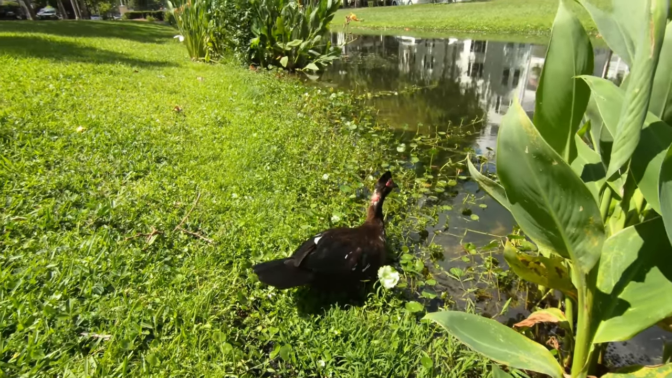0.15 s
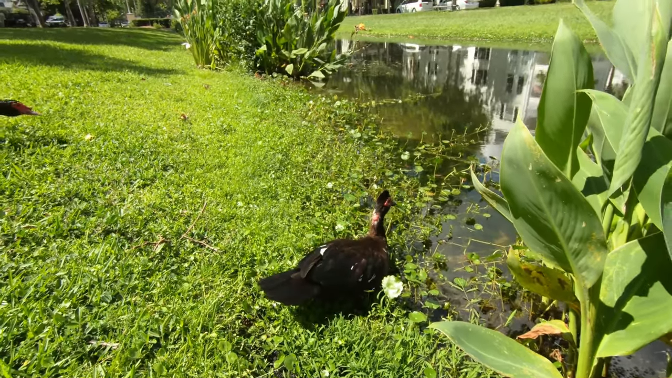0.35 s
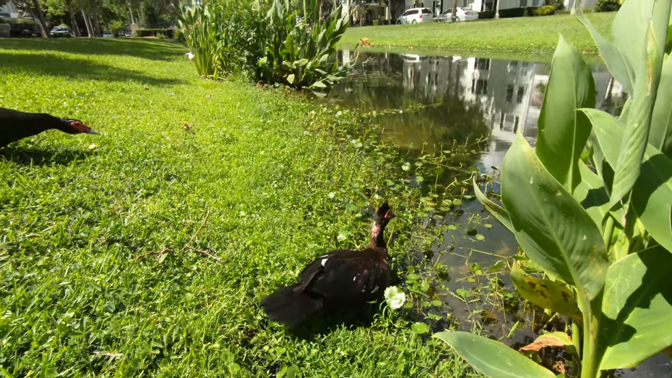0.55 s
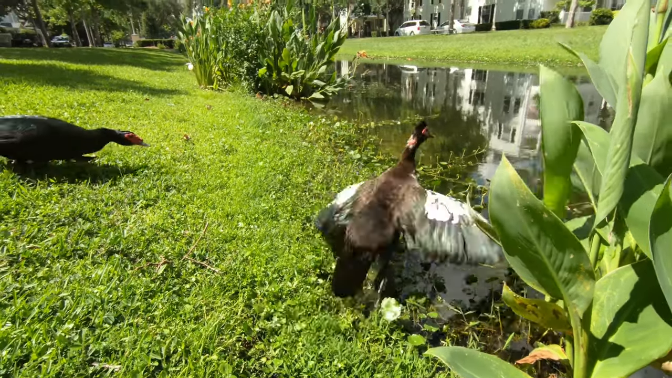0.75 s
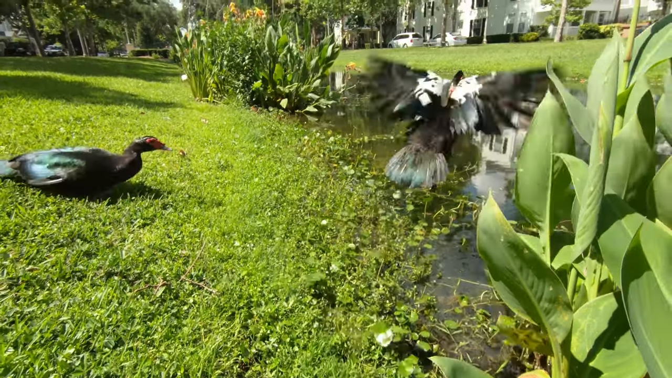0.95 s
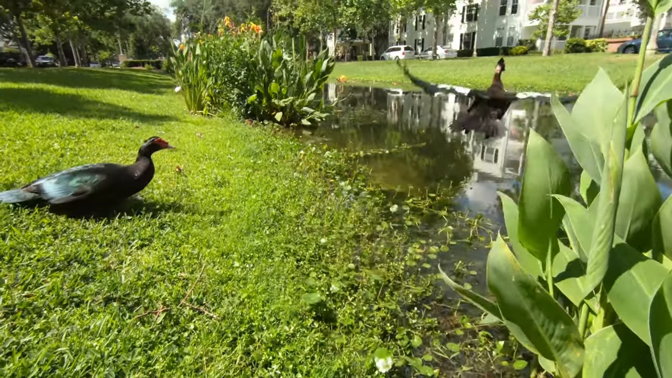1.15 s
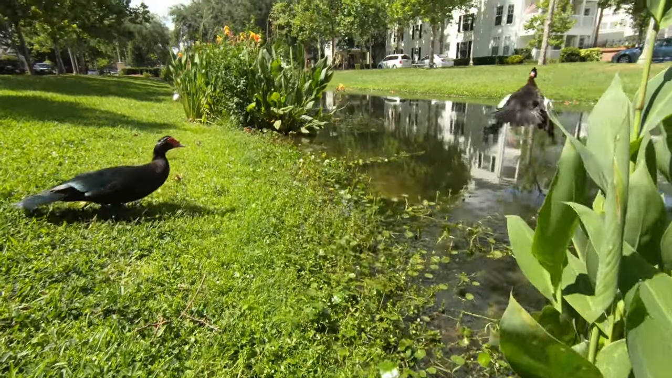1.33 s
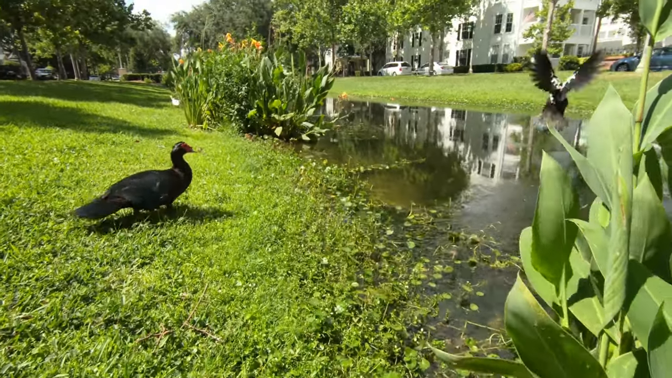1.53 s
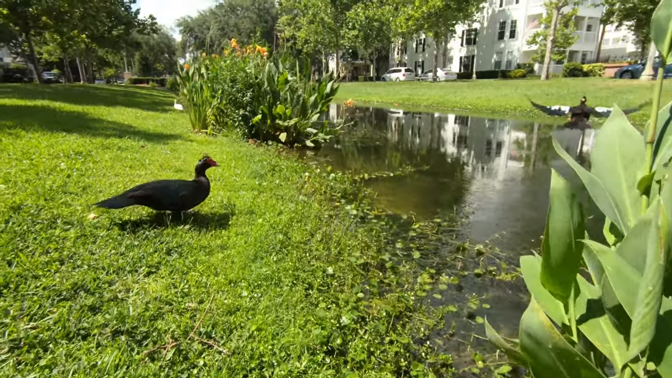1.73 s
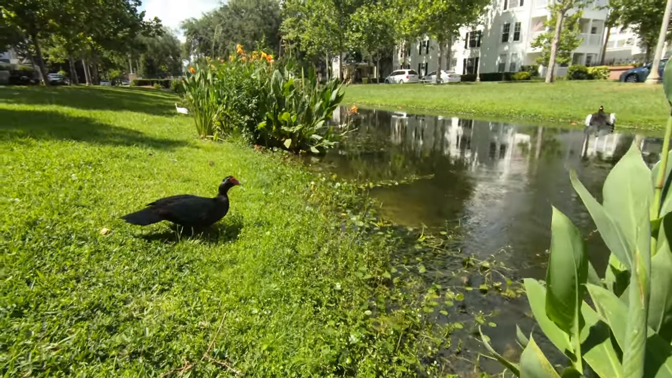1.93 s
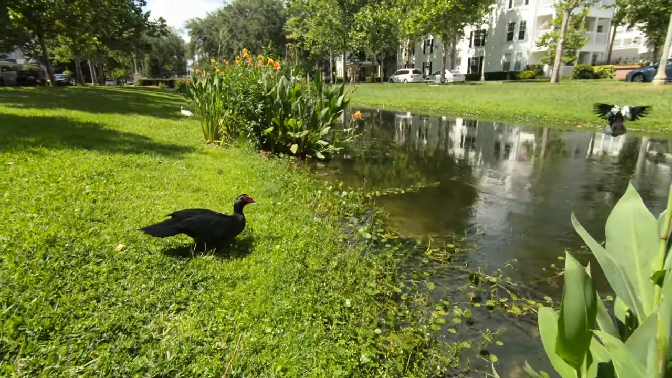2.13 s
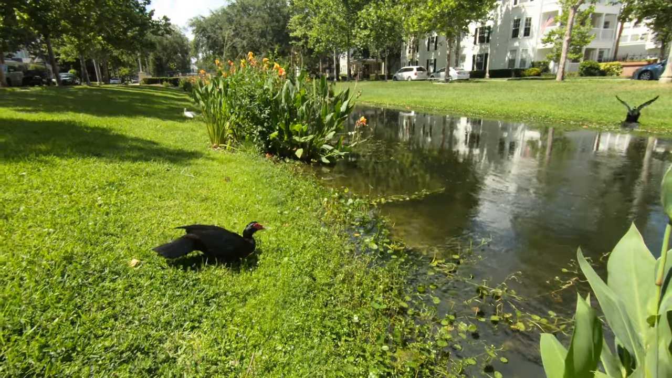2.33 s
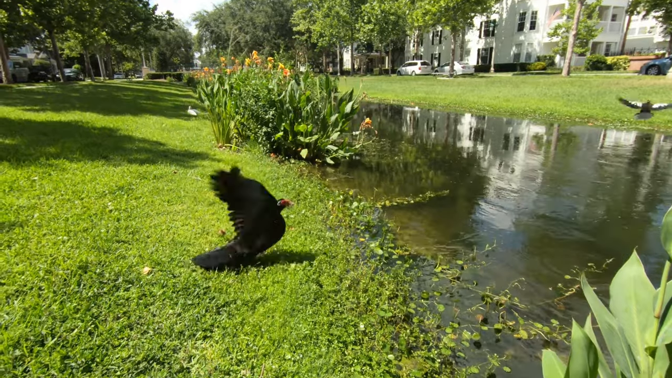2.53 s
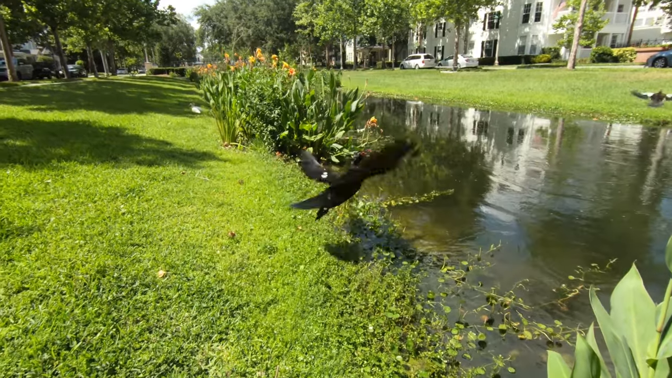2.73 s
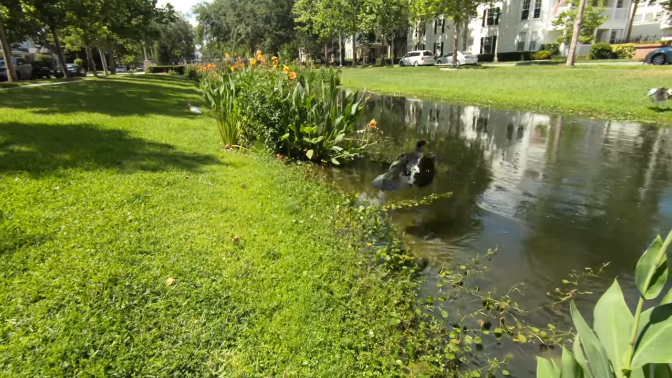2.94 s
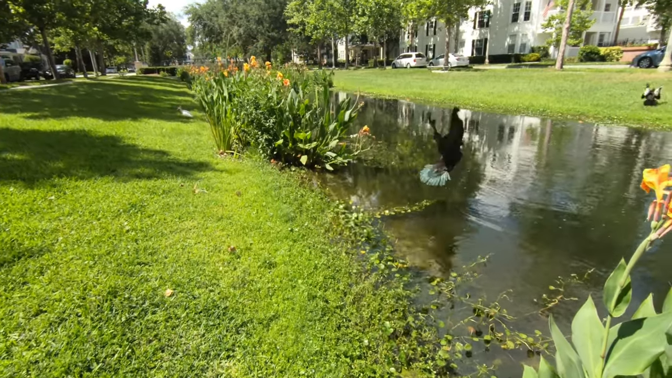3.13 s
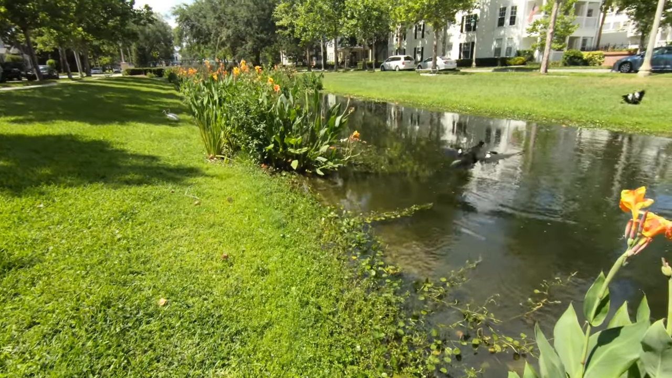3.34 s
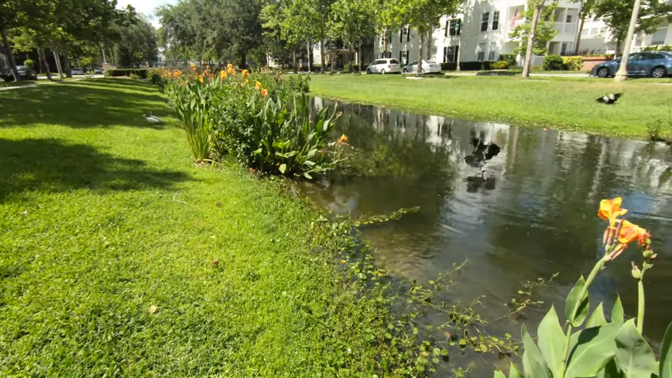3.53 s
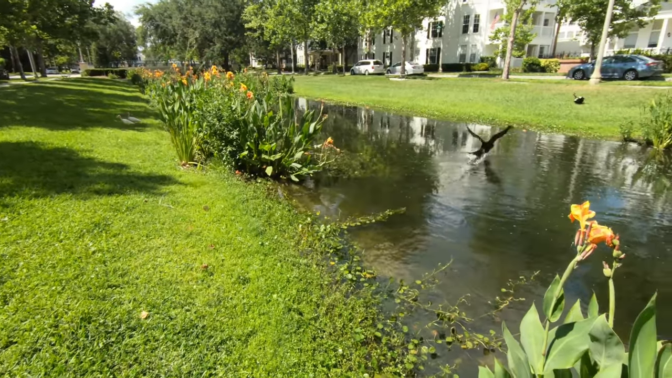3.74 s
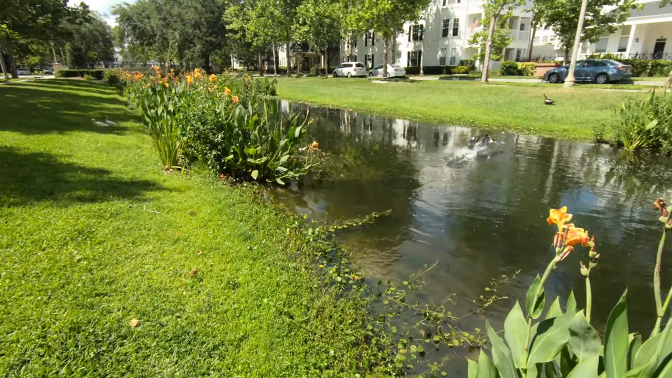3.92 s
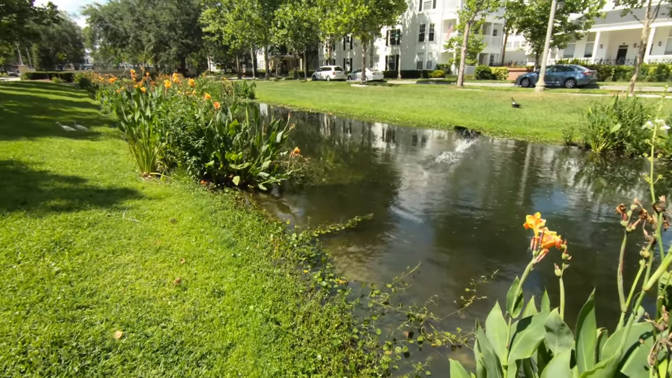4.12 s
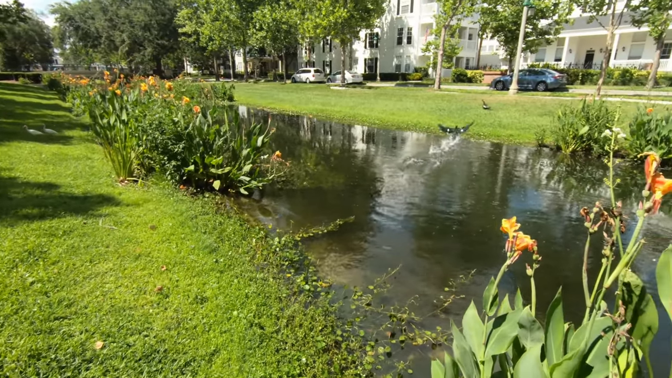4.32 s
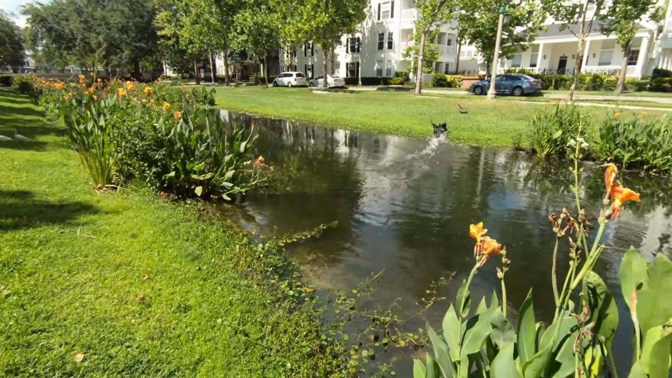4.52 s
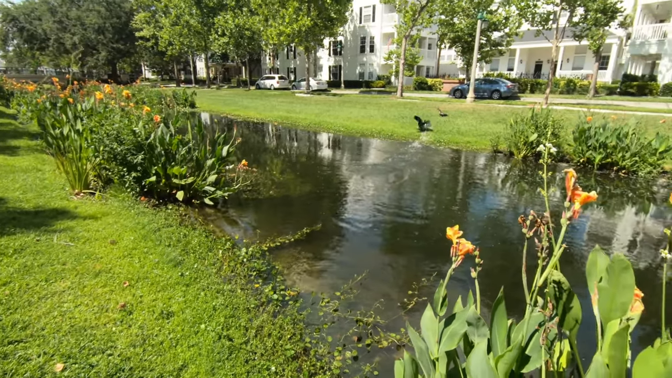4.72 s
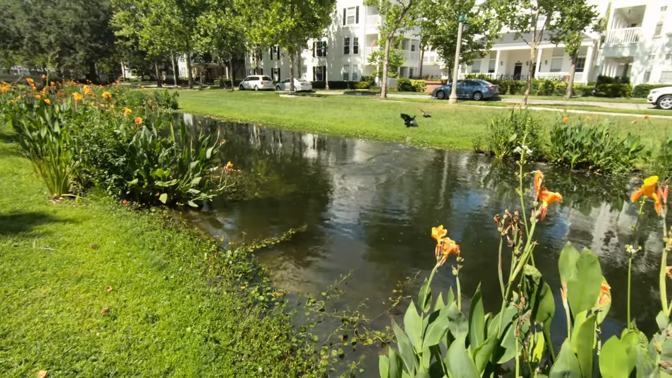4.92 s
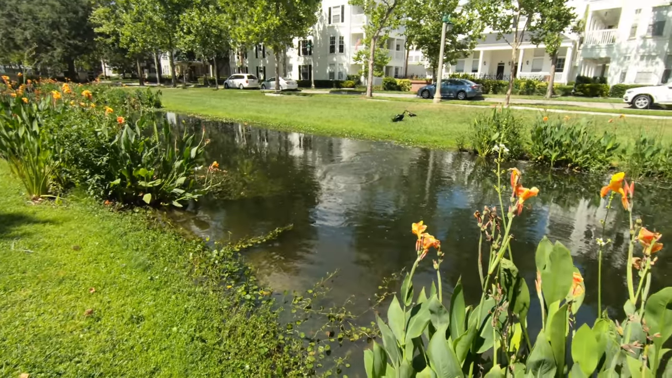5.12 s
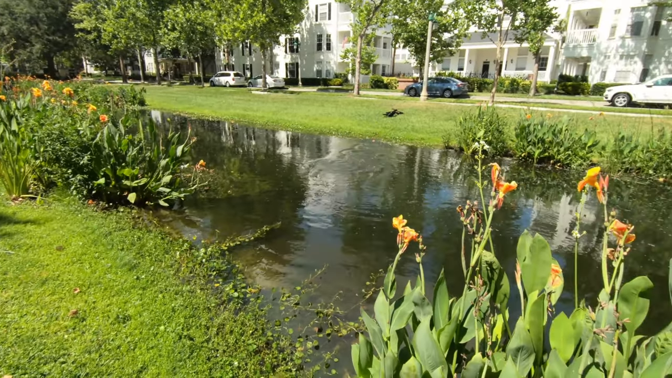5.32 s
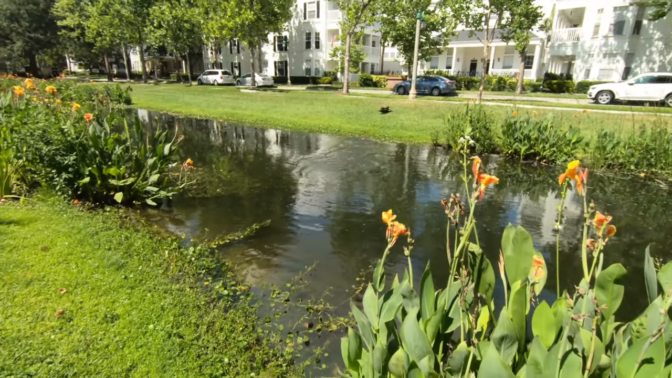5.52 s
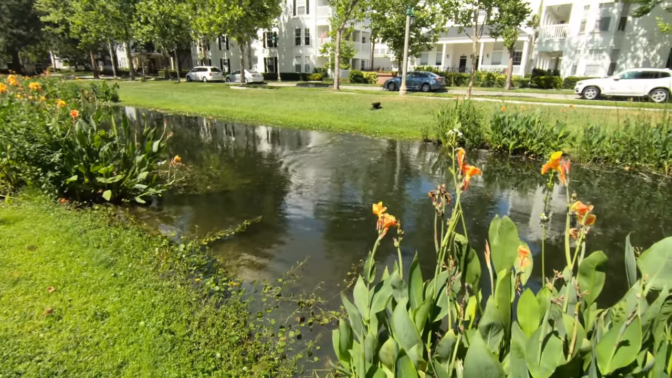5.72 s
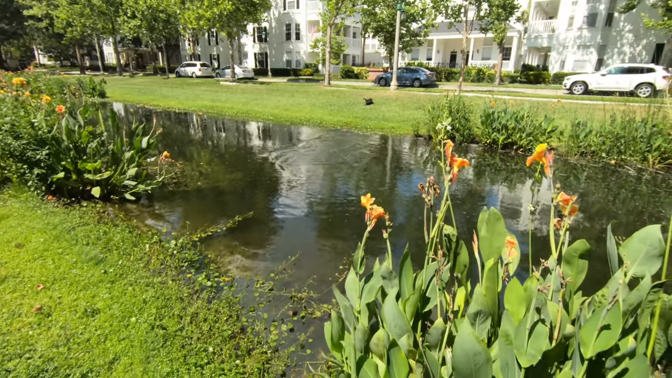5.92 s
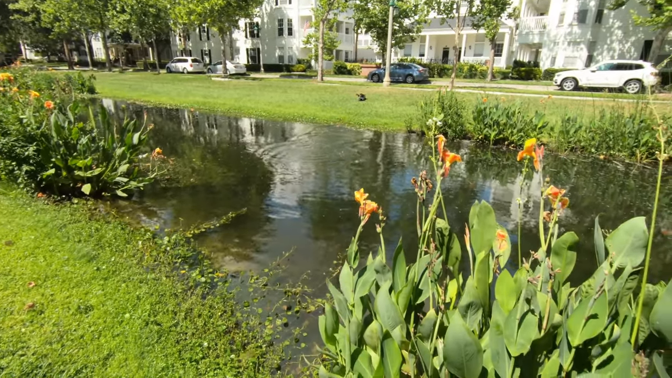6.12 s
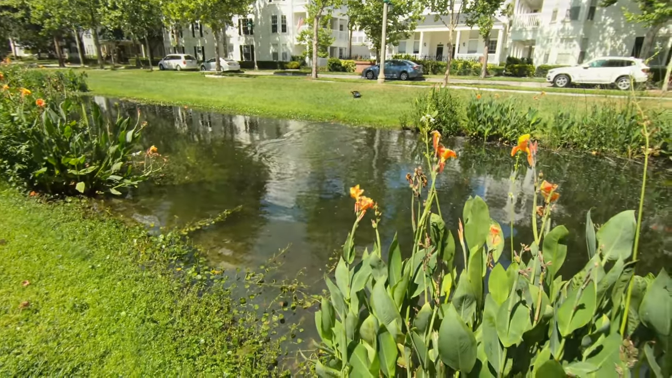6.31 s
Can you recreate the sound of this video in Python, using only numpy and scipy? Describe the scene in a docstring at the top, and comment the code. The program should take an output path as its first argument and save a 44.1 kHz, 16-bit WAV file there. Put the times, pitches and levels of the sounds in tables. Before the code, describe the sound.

Stiff duck wings rustle open and beat away in two fading bursts, then water splashes and drips over soft insect hiss and low wind rumble.

```python
"""Two heavy ducks take off close by, one after the other, from the grassy bank of a canal.
Wings rustle and snap open, then beat away: fluttering tones and pulsed noise make the thrum and rush.
The second duck squelches in mud, then skims the water: noise bursts, grains and ringing bubbles make the spray.
A small bird chirps once (a gliding sine); the near sounds and the chirp return in a faint diffuse echo.
Behind lie shaped noise for town, insects and a car far off, and a breeze rumbling on the microphone."""
import sys
import numpy as np
from scipy import signal
from scipy.fft import rfft, irfft, next_fast_len
from scipy.io import wavfile
from scipy.ndimage import uniform_filter1d, map_coordinates

SR = 44100
rng = np.random.default_rng(int(sys.argv[2]) if len(sys.argv) > 2 else 0)


def int16_out(signal):
    """Quantize to a 16-bit WAV file."""
    q = np.round(np.clip(np.atleast_2d(signal).T, -1, 1) * 32767)
    wavfile.write(sys.argv[1], SR, q.astype(np.int16))


N = 280506

# The two ducks: leap t/s, then dark whoosh, bright swish and feather hiss level/dB relative to a beat's rush,
# and upstroke level/dB relative to the downstroke
DUCKS = [(0.8, 2.8, -0.7, -0.3, -3), (2.63, 4, 1.7, -0.6, -3.5)]
# Wing downstrokes: mid-stroke t/s, air rush reference level/dB, thrum reference level/dB
DOWNSTROKES = [(0.902, -35, -26), (1.045, -37, -36), (1.188, -40, -36.5), (1.333, -43.5, -38.5),
               (1.479, -43.5, -31.5), (1.626, -47.5, -46), (1.773, -47, -42), (1.924, -51, -40),
               (2.772, -33.8, -30), (2.925, -34.5, -25.5), (3.069, -39, -32.5), (3.216, -39.5, -36),
               (3.365, -42, -40), (3.513, -41, -34.5), (3.658, -43.7, -38.5), (3.808, -46, -35.5)]
# Air rushing off the wing, dark part: f/Hz, relative level/dB (per Hz)
WHOOSH_SPECTRUM = [(150, -24.5), (300, -2.5), (460, 0), (650, -6), (830, -6.5), (1050, -11.5), (1500, -24),
                   (2500, -33)]
# Air rushing off the wing, bright part: f/Hz, relative level/dB (per Hz)
SWISH_SPECTRUM = [(500, -17), (850, -4.5), (1100, -2), (1300, -3), (1600, -2), (2100, -13.5), (3000, -22)]
# Feather hiss and crackle: f/Hz, relative level/dB (per Hz)
FEATHER_SPECTRUM = [(1200, -17), (2200, -2), (3400, 0.5), (4600, 2), (5300, -3), (6500, -8.5), (10000, -14),
                    (13000, -18), (16000, -30)]
WHOOSH_DB_PER_DB, FULL_RUSH_DB = 0.15, -39  # strokes harder than this are also darker
LIFT_DELAY_S, LIFT_RISE_S, LIFT_FALL_S = 0.036, 0.016, 0.03  # the wing folds and starts to rise
RETURN_DELAY_S, RETURN_S = 0.085, 0.04  # it spreads again at the top
RETURN_DB, RETURN_FADE_DB_PER_S = -1.5, 14  # loudest in the laboured beats just after the leap
RUSTLE_DB, RUSTLE_DELAY_S, RUSTLE_S = -8.5, 0.065, 0.12  # feathers never quite rest between strokes
DOWNWASH_DB, DOWNWASH_DELAY_S, DOWNWASH_S = -7, 0.03, 0.14  # soft low push of air behind each stroke

# Wings opening over plumage, grass and leaves: middle t/s, length/s, body level/dB, hiss reference level/dB
BRUSHES = [(0.742, 0.082, -48, -41.5), (0.782, 0.024, -42, -36), (0.835, 0.051, -24, -23.3),
           (2.577, .04, -51, -42.5), (2.686, 0.08, -39, -42)]
# Body of that brushing: f/Hz, relative level/dB (per Hz)
BRUSH_SPECTRUM = [(60, -16), (130, 3), (350, -3), (750, 0.5), (1100, -2.5), (1600, -4), (2200, -15),
                  (3200, -18)]
# Snaps of feather tips and stems: t/s, reference level/dB, bright edge and knock relative level/dB
SNAPS = [(0.7116, -35, -9, -3), (0.7955, -11.5, -28, -25), (0.8054, -16, -18, -13), (2.556, -40, -9, -4),
         (2.634, -27, -0.5, 0)]
# Ring of a snap: f/Hz, relative level/dB (per Hz)
SNAP_RING_SPECTRUM = [(1500, -23), (2700, -3.5), (3800, -1.5), (4700, 6.5), (6000, -8), (9000, -47)]
# Bright edge of a snap: f/Hz, relative level/dB (per Hz)
SNAP_EDGE_SPECTRUM = [(4000, -34), (6000, 0), (8000, 1), (12000, -5), (16000, -16)]
# Knock of a snap: f/Hz, relative level/dB (per Hz)
KNOCK_SPECTRUM = [(250, -14), (600, -4), (1000, -8.5), (1500, -5.5), (2100, -7), (3200, -12), (4500, -3)]
# The second duck kicks off from the soggy bank: middle t/s, length/s, squelch f/Hz, level/dB
SQUELCHES = [(2.66, .02, 800, -45), (2.702, .035, 750, -38), (2.815, .028, 900, -38),
             (2.853, .026, 750, -42.5), (2.853, .014, 2700, -41)]

# Feet and wing tips slapping the water: t/s, smack, plop and thrown spray reference level/dB
SLAPS = [(3.251, -33, -31, -54), (3.6862, -31, -43, -40.5), (3.7446, -31, -38, -41.5),
         (3.8902, -26.5, -39, -58), (3.994, -25.5, -39, -43.5), (4.238, -35, -36, -46),
         (4.3582, -31, -29.5, -53), (4.3702, -33, -37, -55), (4.4916, -33, -45, -48),
         (4.5327, -28.5, -45, -52.5)]
# Last single drops: t/s, reference level/dB
DRIPS = [(4.7817, -37.5), (4.8948, -36), (5.1284, -37)]
# Churned water: f/Hz, relative level/dB (per Hz)
CHURN_SPECTRUM = [(180, -40), (300, -6.5), (330, -14), (480, -1), (735, -10.5), (1230, -4.5), (1360, -8.5),
                  (1680, -2), (1880, -13.5), (2400, -14), (3120, -44), (5280, -120)]
# Drops and smacks on the surface: f/Hz, relative level/dB (per Hz)
DROPLET_SPECTRUM = [(1410, -27), (2400, -6), (3310, -2.5), (3600, 2.5), (3830, 1.5), (4730, 2),
                    (6030, -10.5), (6670, -8.5), (8240, -14), (10700, -15), (15500, -28)]
# Low slosh of the wake: f/Hz, relative level/dB (per Hz)
SLOSH_SPECTRUM = [(80, -4), (130, 0), (260, -2), (380, -5), (550, -14)]
# Fine mist over the wake: f/Hz, relative level/dB (per Hz)
MIST_SPECTRUM = [(5000, -12), (7000, 0), (11000, -2.5), (15000, -14)]
SPRAY_RISE_S, SPRAY_FALL_DB_PER_S = 0.025, 31  # drops rain back after each slap
WAKE_S, WAKE_LENGTH_S, WAKE_DB = 4.27, 1.05, -46.3  # churn of the skimming duck: middle, length, level
SLOSH_DB, MIST_DB = -10, -11.5  # relative to the churn

# The small bird's falling chirp: t/s, f/Hz, level/dB
CHIRP = [(4.265, 8380, -58), (4.29, 8400, -41), (4.308, 8360, -43.5), (4.33, 7800, -49.5),
         (4.365, 7300, -50.5), (4.39, 7100, -70)]
# Echo of the far bank: f/Hz, time to fall 60 dB/s
BANK_DECAY = [(200, 0.28), (1500, 0.29), (5000, 0.66), (12000, 0.27)]
# A car rolling on the far side: t/s, level/dB
CAR_LEVEL = [(4.3, -66), (5.0, -54), (5.5, -47.5), (6.36, -48.5)]
# Its low drone: f/Hz, relative level/dB (per Hz)
EXHAUST_SPECTRUM = [(45, -12), (66, 1.5), (78, -5), (94, -4.5), (125, -10.5), (170, -21)]
# The surroundings: t/s, town level/dB, insect level/dB
AIR_LEVELS = [(0, -51, -53.5), (.6, -51.5, -52), (2.2, -50, -52.5), (3.5, -48, -51), (5.2, -50, -54.5),
              (6.36, -50, -55.5)]
# Distant town: f/Hz, relative level/dB (per Hz)
TOWN_SPECTRUM = [(76, -20), (130, -4.5), (194, -2.5), (246, -4.5), (333, -11), (363, -9), (422, -10),
                 (450, -11.5), (663, -9.5), (724, -10), (978, -11.5), (1480, -12.5), (2600, -18.5),
                 (3380, -70), (5720, -120)]
# Insects: f/Hz, relative level/dB (per Hz)
INSECT_SPECTRUM = [(1530, -20.5), (2600, -1.5), (3460, -2.5), (4020, -1), (4500, 0), (5860, -10.5),
                   (10400, -13.5), (11600, -14), (15100, -17.5), (15700, -18)]
# Likeness of the background noise at left and right: f/Hz, correlation (1 = the same)
LEFT_RIGHT_LIKENESS = [(60, 1.0), (180, 1.0), (550, 1.0), (1650, 1.0), (4970, 1), (15000, 0.79)]
# Breeze on the microphone: t/s, level/dB
BREEZE_LEVEL = [(0, -43.5), (.68, -41), (.88, -31), (1.15, -38), (1.8, -33.5), (2.25, -38.5), (2.95, -34.5),
                (3.7, -39.5), (4.6, -43), (5.45, -38.5), (6.36, -45)]
# Breeze rumble: f/Hz, relative level/dB (per Hz)
RUMBLE_SPECTRUM = [(8.8, -28), (15, 1), (29, -3.5), (49, -12.5), (75, -15), (96, -20.5), (130, -23),
                   (170, -47), (290, -120)]
# Gusts that strike the microphone: middle t/s, length/s, mean eddy f/Hz, eddy level/dB, flurry level/dB
GUSTS = [(0.56, .07, 35, -37, -48), (1.475, .095, 27, -23, -35), (1.648, 0.1, 42, -16.5, -28.5),
         (2.005, 0.085, 19, -25.5, -42), (4.91, .12, 22, -33, -52)]
# Low air noise of gusts and downwash: f/Hz, relative level/dB (per Hz)
FLURRY_SPECTRUM = [(30, -2), (60, -2.5), (110, -4), (160, -9), (230, -20), (400, -40)]
BREEZE_SWING_DB, BREEZE_SWINGS_PER_S = 2, 8
TOP_HZ = 15850  # upper band limit of the recorder


def wingbeats(flutter_hz=226, stroke_s=0.015, pulsing=0.39, edge_lead_s=0.0045):
    """On each downstroke the flight feathers flutter and chop the rushing air; they rustle as the wing lifts."""
    t = clock()
    thrum, whoosh, swish, hiss = np.zeros((4, N))
    for s, rush_db, thrum_db in DOWNSTROKES:
        # the duck that leapt last is the one beating
        leap, whoosh_db, swish_db, hiss_db, lift_db = [duck for duck in DUCKS if duck[0] < s][-1]
        pitch, start = rng.normal(1, 0.031), rng.random()
        phase = 2 * np.pi * (flutter_hz * pitch * (t - s) + start)
        flutter = np.sin(phase) + amp(-18) * np.sin(2 * phase)
        thrum += amp(thrum_db + 5.5) * swell(s, stroke_s) * flutter
        puffs = 1 + pulsing * np.sin(phase)  # the air leaves in puffs, one each flutter
        # the leading edge cuts the air first: bright, then dark
        edge = puffs * stroke_shape(s - edge_lead_s, rise=0.02, fall=0.032)
        push = puffs * swell(s - 0.001, 0.025, order=3)
        up = amp(lift_db) * upstroke(s, since_leap=s - leap)
        dark_db = whoosh_db + WHOOSH_DB_PER_DB * (rush_db - FULL_RUSH_DB)
        whoosh += amp(rush_db + dark_db) * (push + amp(-5.5) * up)
        swish += amp(rush_db + swish_db) * (edge + amp(-1.5) * up)
        hiss += amp(rush_db + hiss_db) * (edge + amp(-0.3) * up)
    dark_air = whoosh * patchy(noise(WHOOSH_SPECTRUM), depth_db=3)
    bright_air = swish * patchy(noise(SWISH_SPECTRUM), depth_db=4.5)
    feather_grains = grains(FEATHER_SPECTRUM, rate=1600, spread_db=3.5, share=0.45)
    feathers = hiss * patchy(feather_grains, depth_db=3)
    return thrum + mirrored(dark_air + bright_air, delay=0.00186, strength=0.19) + feathers


def upstroke(s, since_leap):
    """Rustle level after the downstroke at time s: the wing folds, rises and spreads again."""
    lift = stroke_shape(s + LIFT_DELAY_S, LIFT_RISE_S, LIFT_FALL_S)
    spread = amp(RETURN_DB - RETURN_FADE_DB_PER_S * since_leap) * swell(s + RETURN_DELAY_S, RETURN_S)
    rustle = amp(RUSTLE_DB) * swell(s + RUSTLE_DELAY_S, RUSTLE_S)
    return np.sqrt(lift ** 2 + spread ** 2 + rustle ** 2)


def stroke_shape(s, rise, fall):
    """A bump that peaks at time s, with its own widths before and after."""
    return np.where(clock() < s, swell(s, rise), swell(s, fall))


def mirrored(x, delay, strength):
    """The direct sound plus its bounce off the flat water, scaled to keep about the same power."""
    bounce = np.interp(clock() - delay, clock(), x)
    return (x + strength * bounce) / np.hypot(1, strength)


def downwash():
    """Every downstroke shoves a low puff of air along the bank."""
    level = np.zeros(N)
    for s, rush_db, _ in DOWNSTROKES:
        level += amp(rush_db + DOWNWASH_DB) * swell(s + DOWNWASH_DELAY_S, DOWNWASH_S)
    return level * noise(FLURRY_SPECTRUM)


def brushes():
    """Stiff feathers scrape past each other and through the plants on the bank."""
    body = sum(amp(db) * swell(s, length, order=4) for s, length, db, _ in BRUSHES)
    hiss = sum(amp(db) * swell(s, length, order=4) for s, length, _, db in BRUSHES)
    scrape = patchy(noise(BRUSH_SPECTRUM), depth_db=2.0)
    crackle = patchy(grains(FEATHER_SPECTRUM, rate=3600, spread_db=4, share=0.53), depth_db=1.0)
    return body * scrape + amp(-0.5) * hiss * crackle


def snaps():
    """Sharp snaps as the wings are flung open: decaying bursts through ring, edge and knock colours."""
    s, db, edge_db, knock_db = np.transpose(SNAPS)
    ring = cracks(s, db - 2, t60=0.006, tail_db=-11, tail_t60=0.03)
    edge = cracks(s, db + edge_db + 4, t60=0.008, tail_db=-12, tail_t60=0.071)
    knock = cracks(s, db + knock_db + 4, t60=0.02, tail_db=-9, tail_t60=0.073)
    bright = coloured(ring, SNAP_RING_SPECTRUM) + coloured(edge, SNAP_EDGE_SPECTRUM)
    return bright + coloured(knock, KNOCK_SPECTRUM)


def squelches():
    """Pockets of air burst in wet mud under the pushing feet."""
    out = np.zeros(N)
    for s, length, hz, db in SQUELCHES:
        pocket = [(hz * 0.6, -14), (hz, 0), (hz * 1.4, -14)]
        out += amp(db) * swell(s, length, order=3) * grains(pocket, rate=400, spread_db=3, share=0.7)
    return out


def splashes():
    """Slaps on the surface, churned water and a patter of drops behind the skimming duck."""
    churn_level = swell(WAKE_S, WAKE_LENGTH_S) * amp(WAKE_DB + 1.2 * wobble(35))
    spray_power = sum((amp(db) * spray(s)) ** 2 for s, _, _, db in SLAPS)
    drops_level = np.sqrt(spray_power) * amp(0.8 * wobble(35))
    churn = churn_level * patchy(grains(CHURN_SPECTRUM, rate=300, spread_db=1.5, share=0.42), depth_db=2.5)
    drops = drops_level * patchy(grains(DROPLET_SPECTRUM, rate=450, spread_db=3.5, share=0.55), depth_db=3)
    plinks = bubbles(drops_level * amp(-2.5), rate=140, pitch_hz=2900, spread=0.6, cycles=24)
    s, smack_db, plop_db, _ = np.transpose(SLAPS)
    smack = coloured(cracks(s, smack_db - 7.5, t60=0.012, tail_db=-5.5, tail_t60=0.1), DROPLET_SPECTRUM)
    plop = coloured(cracks(s, plop_db - 1.5, t60=0.025, tail_db=-10, tail_t60=0.06), CHURN_SPECTRUM)
    drip_s, drip_db = np.transpose(DRIPS)
    drips = coloured(cracks(drip_s, drip_db - 7, t60=0.012, tail_db=-6, tail_t60=0.08), DROPLET_SPECTRUM)
    slosh = churn_level * amp(SLOSH_DB) * patchy(noise(SLOSH_SPECTRUM), depth_db=2.5)
    mist = churn_level * amp(MIST_DB) * grains(MIST_SPECTRUM, rate=1500, spread_db=3, share=0.4)
    return churn + slosh + mist + drops + plinks + smack + plop + drips


def spray(s):
    """Level of the drops that rain back after a slap at time s."""
    age = np.maximum(clock() - s, 0)
    return (1 - np.exp(-age / SPRAY_RISE_S)) * amp(-SPRAY_FALL_DB_PER_S * age)


def bubbles(level, rate, pitch_hz, spread, cycles):
    """Short rising rings of trapped air, at random times, sized by a level curve."""
    chance = rng.random((int(rate * N / SR), 3))  # one row a bubble: time, pitch, size
    start = (chance[:, :1] * (N - 1)).astype(int)
    hz = pitch_hz * np.exp(spread * (2 * chance[:, 1:2] - 1))
    size = level[start] * amp(-4 * np.log(chance[:, 2:] + 0.03))
    step = np.arange(SR // 50)
    age = hz * step / SR / cycles  # 1 after the given number of cycles at the starting pitch
    envelope = np.exp(-3 * age) * (1 - np.exp(-20 * age))
    ring = size * envelope * np.sin(2 * np.pi * cycles * age * (1 + 0.053 * age))
    return np.bincount((start + step).ravel(), ring.ravel(), N)[:N]


def small_bird():
    """A thin whistle that holds, then falls with a quaver."""
    hz, db = curves(CHIRP)
    fall = hz.max() - hz
    phase = 2 * np.pi * np.cumsum(hz + 0.45 * fall * wobble(400)) / SR
    sounding = (clock() > CHIRP[0][0]) * (clock() < CHIRP[-1][0])
    return amp(db) * np.sin(phase) * sounding


def echo(x):
    """A faint diffuse answer from trees and houses: noise that decays at its own rate in each band."""
    hz, t, z = signal.stft(rng.standard_normal(SR // 2), SR, nperseg=256)
    decay = amp(-60 * t / along(BANK_DECAY, hz)[:, None])
    tail = signal.istft(z * decay, SR, nperseg=256)[1]
    delayed = np.pad(x, (SR // 50, 0))  # 20 ms
    return signal.fftconvolve(delayed, tail / np.linalg.norm(tail))[:N]


def far_car():
    """Only the low drone of a slow car carries across the water."""
    db, = curves(CAR_LEVEL)
    return amp(db) * noise(EXHAUST_SPECTRUM)


def surroundings():
    """Far traffic and insect sizzle, near mono, with some independent left and right hiss in the highest treble."""
    town_db, insects_db = curves(AIR_LEVELS)
    town = amp(town_db + 0.27 * wobble(5.13))
    insects = amp(insects_db + 0.6 * wobble(8))
    pair = np.array([town * noise(TOWN_SPECTRUM) + insects * noise(INSECT_SPECTRUM) for _ in range(2)])

    def mid_side_gains(hz):
        """Share two independent noises so that left and right are as alike as the table says."""
        turn = np.arccos(np.clip(along(LEFT_RIGHT_LIKENESS, hz), -1, 1)) / 2
        return np.array([np.cos(turn), np.sin(turn)])

    mid, side = filtered(pair, mid_side_gains)
    return np.array([mid + side, mid - side])


def breeze():
    """Air tumbles over the microphone; a gust sheds a few uneven eddies in a brighter flurry."""
    db, = curves(BREEZE_LEVEL)
    out = amp(db + BREEZE_SWING_DB * wobble(BREEZE_SWINGS_PER_S)) * noise(RUMBLE_SPECTRUM)
    flurry = noise(FLURRY_SPECTRUM) * amp(2 * wobble(40))
    for s, length, eddy_hz, eddy_db, flurry_db in GUSTS:
        eddies = np.sin(2 * np.pi * np.cumsum(eddy_hz * (1 + 0.2 * wobble(45))) / SR)
        gust = amp(eddy_db) * np.sqrt(2) * eddies + amp(flurry_db) * flurry
        out += swell(s, length, order=4) * gust
    return out


def cracks(times, levels_db, t60, tail_db, tail_t60):
    """At each time a sharp burst of noise with a weaker, longer tail."""
    t = np.arange(SR // 5) / SR
    shape = amp(-60 * t / t60) + amp(tail_db - 60 * t / tail_t60)
    out = np.zeros(N + SR)
    for s, db in zip(times, levels_db):
        out[round(s * SR):][:len(t)] += amp(db) * shape * rng.choice([-1, 1], len(t))
    return out[:N]


def patchy(x, depth_db):
    """Uneven noise: random smooth level changes over time and pitch."""
    z = signal.stft(x, nperseg=512)[2]
    across_pitch = uniform_filter1d(rng.standard_normal(z.shape), size=3, axis=0)
    field = uniform_filter1d(across_pitch, size=5, axis=1)  # smoothed in time too
    return unit(signal.istft(z * amp(depth_db * unit(field)), nperseg=512)[1][:N])


def grains(spectrum, rate, spread_db, share):
    """Tiny clicks of uneven size, a share of the power, on a bed of like noise."""
    sizes = amp(spread_db * np.minimum(rng.exponential(size=N), 4))
    clicks = (rng.random(N) < rate / SR) * sizes * rng.choice([-1, 1], N)
    share = np.clip(share, 0, 1)
    return np.sqrt(share) * unit(coloured(clicks, spectrum)) + np.sqrt(1 - share) * noise(spectrum)


def noise(spectrum):
    """Coloured noise of rms 1."""
    return unit(coloured(rng.standard_normal(N), spectrum))


def coloured(x, spectrum):
    """x through a causal filter of energy 1 with the given spectrum, closed an octave beyond its ends."""
    size = 8192
    closed = [(spectrum[0][0] / 2, -90), *spectrum, (spectrum[-1][0] * 2, -90)]
    # folding the cepstrum gives minimum phase, so the filter never sounds early
    cepstrum = irfft(np.log(amp(along(closed, np.fft.rfftfreq(size, 1 / SR)))))
    cepstrum[1:size // 2] *= 2
    cepstrum[size // 2 + 1:] = 0
    kernel = irfft(np.exp(rfft(cepstrum)))
    return signal.fftconvolve(x, kernel / np.linalg.norm(kernel))[:N]


def filtered(x, response):
    """x times a response of frequency."""
    size = next_fast_len(N + SR // 2)
    return irfft(rfft(x, size) * response(np.fft.rfftfreq(size, 1 / SR)), size)[..., :N]


def swell(s, length, order=2):
    """A smooth bump around time s; a higher order gives a flatter top."""
    distance = np.minimum(np.abs(2 * (clock() - s) / length), 6)
    return np.exp(-distance ** order)


def wobble(rate):
    """A smooth random curve, rate knots a second."""
    return map_coordinates(rng.standard_normal(int(N * rate / SR) + 4), [clock() * rate])


def curves(rows):
    """One value per sample for each column after the time."""
    s, *cols = np.transpose(rows)
    return [np.interp(clock(), s, c) for c in cols]


def along(points, hz):
    """Read (f/Hz, value) points on a log axis."""
    f, v = np.transpose(points)
    return np.interp(np.log(hz + 1), np.log(f + 1), v)


def clock():
    """The time of every sample in seconds."""
    return np.arange(N) / SR


def unit(x):
    """Scale to rms 1."""
    return x / np.sqrt(np.mean(x ** 2) + 1e-20)


def amp(db):
    """Decibels to gain."""
    return 10 ** (np.asarray(db) / 20)


def scene():
    """Ducks and water close by, a bird, and the open air behind them."""
    near = wingbeats() + brushes() + snaps() + squelches() + splashes()
    bird = small_bird()
    answer = echo(amp(-12.5) * near + amp(-12) * bird)
    background = far_car() + surroundings() + breeze()
    return near + downwash() + bird + answer + background


def record(dry):
    """The recorder keeps nothing above its band limit."""
    return filtered(dry, lambda hz: hz < TOP_HZ)


dry = scene()
out = record(dry)
int16_out(out)
```